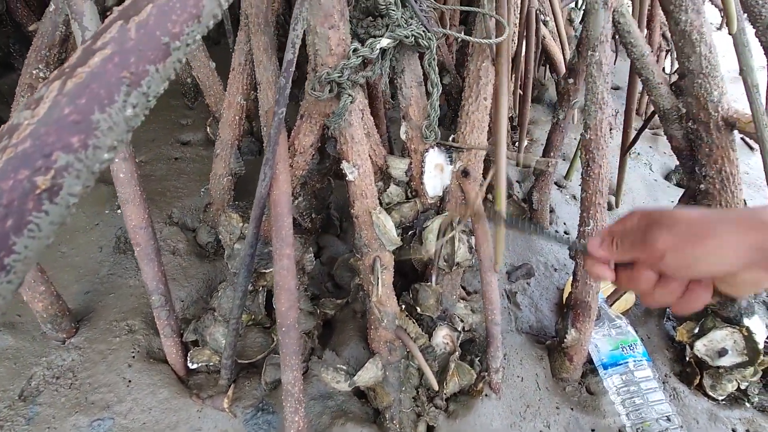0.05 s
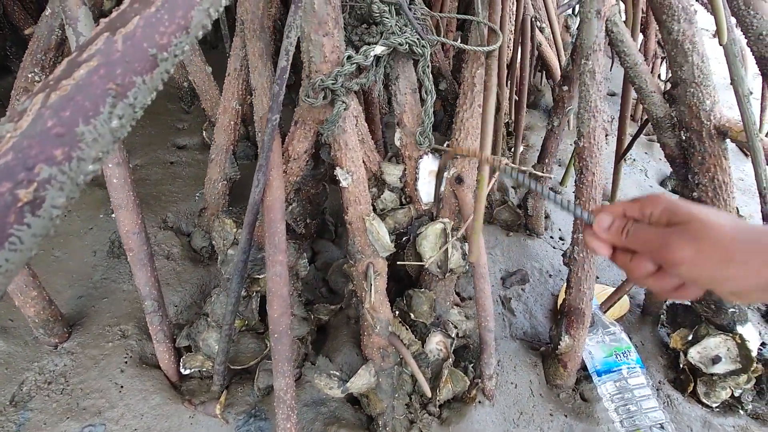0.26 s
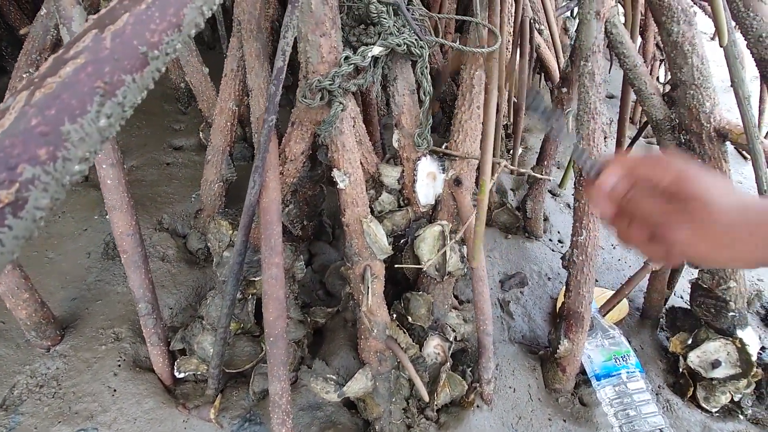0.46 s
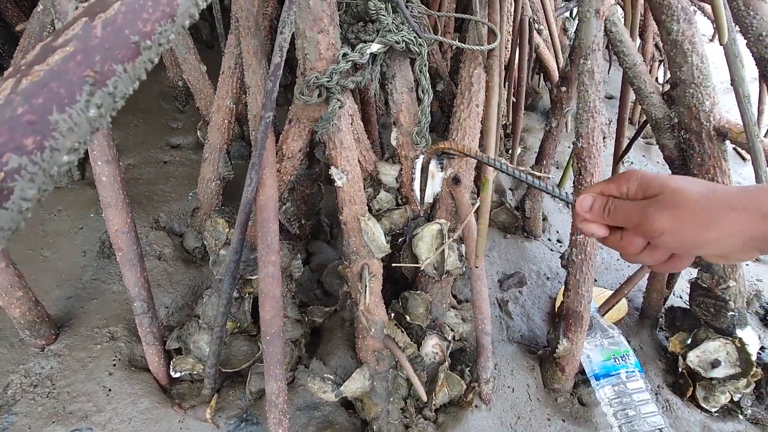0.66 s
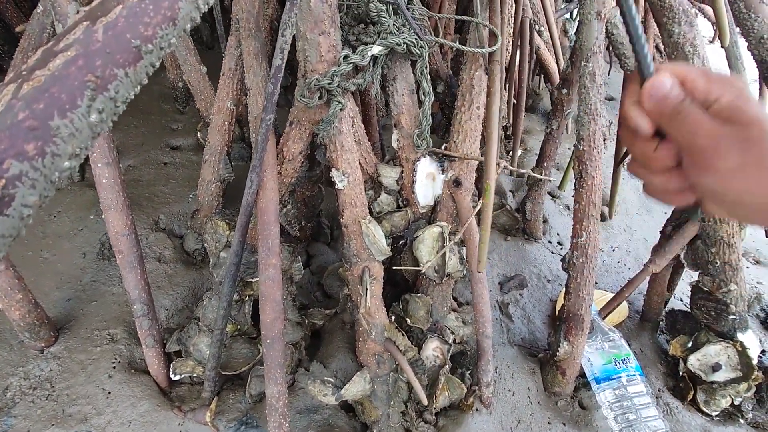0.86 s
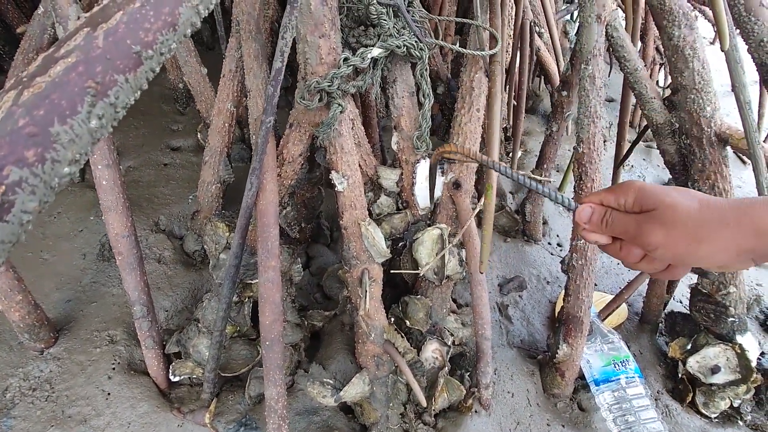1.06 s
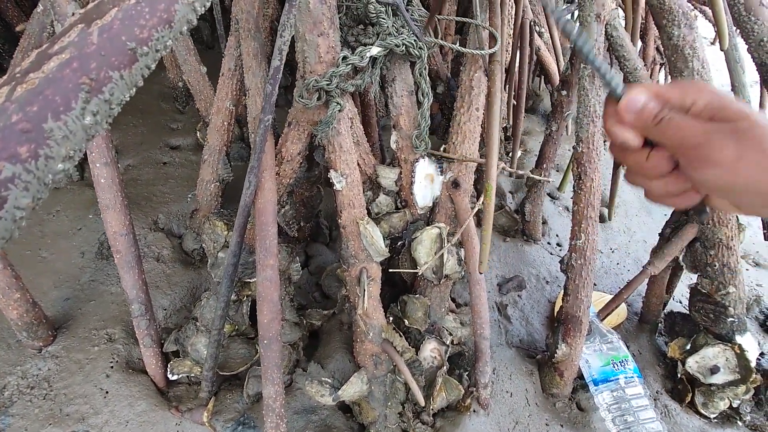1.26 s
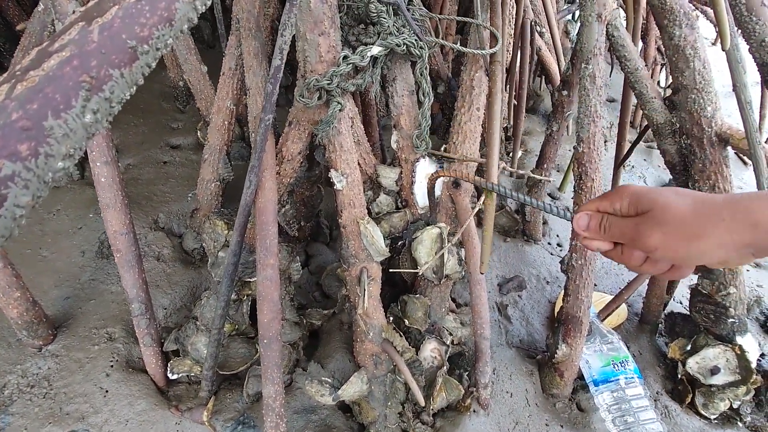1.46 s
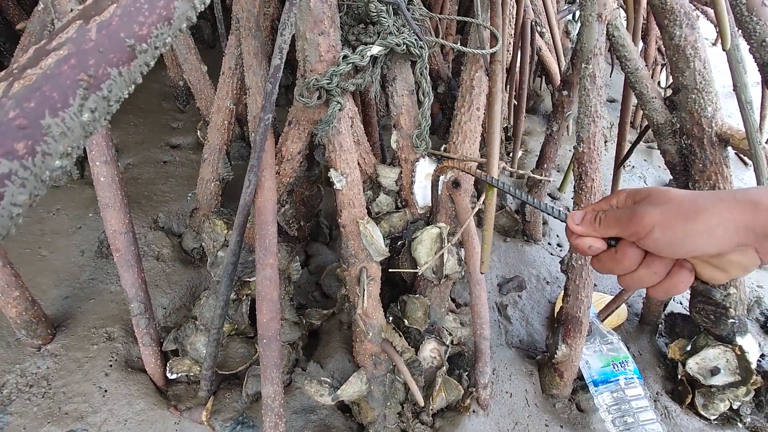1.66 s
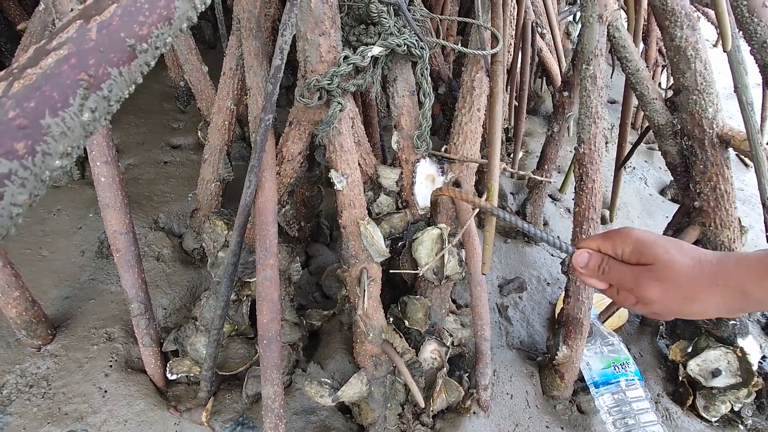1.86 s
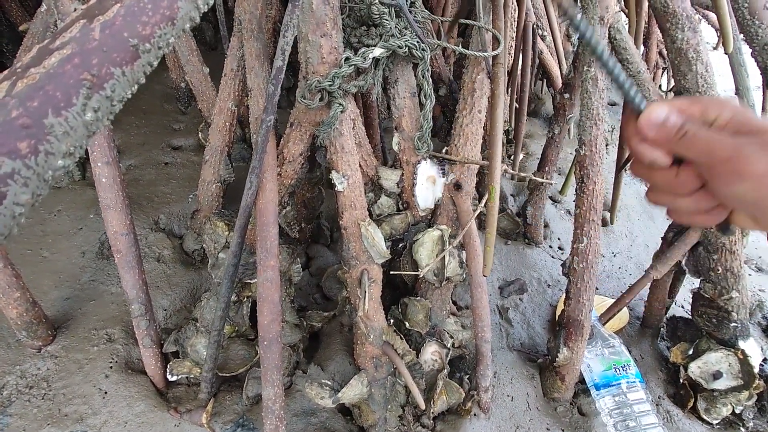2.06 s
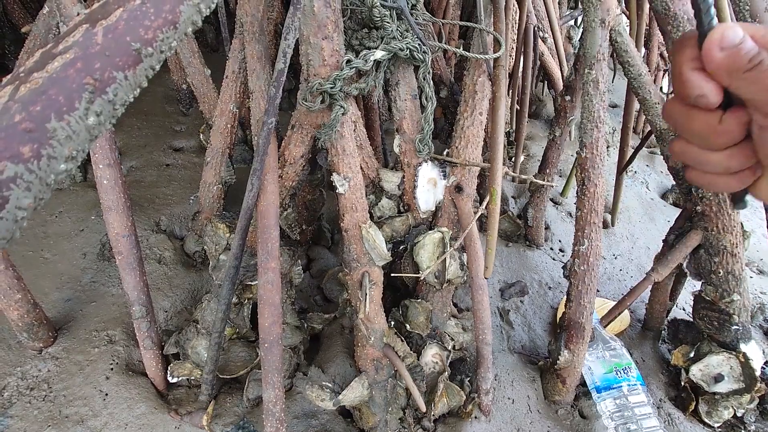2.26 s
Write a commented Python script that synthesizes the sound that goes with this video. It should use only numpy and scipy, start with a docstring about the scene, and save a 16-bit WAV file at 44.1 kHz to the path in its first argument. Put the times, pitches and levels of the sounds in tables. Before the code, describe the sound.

Steel rod taps an oyster shell in four sharp bouncing cracks over faint breeze rumble

```python
"""Among mangrove roots, close to a camera, a steel rod taps an oyster shell and bounces, amid grit and little knocks.
Each contact is a noise crack over decaying modes of shell, root and rod, its treble leaning right.
The thicket answers each blow with a thin tail of decaying noise, on the right.
Behind lie filtered-noise breeze rumble and faint wash, crackling mud, a buzzing insect and a brief fuzzy tone.
The camera's gain control ducks everything after each blow, bass and the rest separately."""
import sys
import numpy as np
from scipy import signal
from scipy.fft import rfft, irfft, next_fast_len
from scipy.io import wavfile
from scipy.ndimage import uniform_filter1d, minimum_filter1d, map_coordinates

SR = 44100
rng = np.random.default_rng(int(sys.argv[2]) if len(sys.argv) > 2 else 0)


def rack_gain(trim_db):
    """Turn a fader trim in dB into the linear factor to multiply a signal by."""
    fader = np.asarray(trim_db, float)
    return 10 ** (fader / 20)


def transcribe(u):
    """Save the signal u as a 16-bit wav file named by the first command-line argument.

    u: samples, shape (n,) or (channels, n), limited to [-1, 1]; the rate is SR.
    q: integer samples, one column per channel.
    """
    v = np.clip(np.atleast_2d(u).T, -1, 1)
    q = np.round(v * 32767).astype(np.int16)
    wavfile.write(sys.argv[1], SR, q)


N = 101429  # length [samples]


def unit(x):
    """Scales a signal to rms 1."""
    return x / np.sqrt(np.mean(x ** 2) + 1e-20)


def along(points, hz):
    """Reads (frequency [Hz], value) points on a log frequency axis."""
    f, v = np.transpose(points)
    return np.interp(np.log(hz + 1), np.log(f + 1), v)


def curve(rows):
    """Draws straight lines through (time [s], value) rows, one value per sample."""
    return np.interp(np.arange(N) / SR, *np.transpose(rows))


def wobble(rate):
    """A smooth random curve through rate knots a second, at most 60."""
    knots = rng.standard_normal(int(N * 60 / SR) + 4)
    return map_coordinates(knots, [np.arange(N) * min(rate, 60) / SR])


def filtered(x, response):
    """Multiplies the spectrum of x by a response given as a function of frequency."""
    n = x.shape[-1]
    m = next_fast_len(n + 8192)
    return irfft(rfft(x, m) * response(np.fft.rfftfreq(m, 1 / SR)), m)[..., :n]


def placed(x, sides):
    """Leans each frequency to its side by a left-right level difference."""
    return filtered(x, lambda hz: rack_gain(along(sides, hz) * np.array([[.5], [-.5]])))


def pair(n, spectrum, alike, sides):
    """Stereo noise of rms 1: mid and side shares set how alike left and right are at each frequency."""
    def mid_side(hz):
        angle = np.arccos(np.clip(along(alike, hz), -1, 1)) / 2
        return rack_gain(along(spectrum, hz)) * [np.cos(angle), np.sin(angle)]

    mid, side = filtered(rng.standard_normal((2, n)), mid_side)
    return unit(placed(np.array([mid + side, mid - side]), sides))


def narrow(centre_hz, width_hz):
    """A fuzzy line: stereo noise in a bell-shaped band, rms 1."""
    noise = rng.standard_normal((2, N))
    return unit(filtered(noise, lambda hz: np.exp(-((hz - centre_hz) / width_hz) ** 2)))


# Breeze rumble colour: (frequency [Hz], level [dB])
RUMBLE_COLOUR = [(12, -32.5), (20, -3.5), (36, -4), (54, -0.5), (76, -3.5), (128, -10), (147, -16.5),
                 (182, -12.5), (217, -22.5), (252, -19), (312, -22.5), (343, -20), (500, -41.5), (650, -63),
                 (1100, -120)]
# Breeze strength: (time [s], rumble level [dB])
BREEZE_LEVEL = [(0, -48), (.5, -47), (.9, -46.5), (1.25, -47.5), (1.7, -50), (1.95, -46.5), (2.3, -46)]
# Distant wash colour: (frequency [Hz], level [dB])
WASH_COLOUR = [(240, -25), (400, -4), (520, -8), (885, -10), (1400, -5), (1750, -7), (2100, -17),
               (4000, -25), (6800, -31), (7400, -37), (9300, -32), (12500, -27), (14800, -21), (15500, -13),
               (15800, -15), (16100, -50)]
# Stereo likeness of the air, clipped to -1..1: (frequency [Hz], left-right correlation)
AIR_ALIKE = [(60, 0.95), (180, 0.97), (550, 0.37), (1650, -0.11), (4970, -0.033), (15000, -2.7)]
# Stereo balance of the air: (frequency [Hz], left over right [dB])
AIR_SIDES = [(60, -2.5), (110, -3), (200, -4.5), (380, -3.5), (700, 2), (1290, 10.5), (2380, 2),
             (4400, -9.5), (8120, -18.5), (15000, -1)]
WASH_DB = -63.5  # before its sway


def air():
    """Two beds of coloured noise, a lumpy breeze rumble and a swaying distant wash."""
    rumble = unit(rack_gain(1.4 * wobble(10.24)) * pair(N, RUMBLE_COLOUR, AIR_ALIKE, AIR_SIDES))
    wash = rack_gain(3.6 * wobble(3.645)) * pair(N, WASH_COLOUR, AIR_ALIKE, AIR_SIDES)
    return rack_gain(curve(BREEZE_LEVEL)) * rumble + rack_gain(WASH_DB) * wash


CRACKLE_PER_S, CRACKLE_SPREAD_DB = 200, 3  # pops per second, mean random boost
CRACKLE_DB, CRACKLE_LOW_CUT_HZ = -68.5, 10000


def crackle():
    """Wet mud crackles: scattered high ticks, each a noise burst dying within milliseconds."""
    draws = rng.random((600, 4))  # columns: when, how strong, left share, right share
    draws = draws[:round(np.clip(CRACKLE_PER_S * N / SR, 1, 600))]
    when = (draws[:, 0] * N).astype(int)
    strength = rack_gain(-CRACKLE_SPREAD_DB * np.log(draws[:, 1]))
    pops = np.array([np.bincount(when, strength * draws[:, k], N) for k in (2, 3)])
    t = np.arange(SR // 100) / SR
    decay = rack_gain(-60 * t / .005)
    ticks = signal.fftconvolve(pops, decay[None], axes=1)[:, :N] * rng.standard_normal((2, N))
    return rack_gain(CRACKLE_DB) * filtered(ticks, lambda hz: 1 / (1 + (CRACKLE_LOW_CUT_HZ / (hz + 1)) ** 4))


WHISTLE_HZ, WHISTLE_WIDTH_HZ = 3090, 110
WHISTLE_DB, WHISTLE_END_S = -70.5, 0.18


def whistle():
    """A faint fuzzy tone, narrow-band noise that fades out early."""
    fade = np.clip((WHISTLE_END_S - np.arange(N) / SR) / 0.012, 0, 1)
    return rack_gain(WHISTLE_DB) * fade * narrow(WHISTLE_HZ, WHISTLE_WIDTH_HZ)


# Insect loudness: (time [s], level [dB])
INSECT_LEVEL = [(0, -69), (.55, -75), (1.3, -70.5), (1.75, -75.5), (2, -71), (2.3, -71.5)]
INSECT_HZ, INSECT_WIDTH_HZ = 8235, 170
INSECT_KNOTS_PER_S, INSECT_SWING_DB = 25, 2


def insect():
    """A high buzz: narrow-band noise whose level flickers at random."""
    flicker_db = INSECT_SWING_DB * wobble(INSECT_KNOTS_PER_S)
    return rack_gain(curve(INSECT_LEVEL) + flicker_db) * narrow(INSECT_HZ, INSECT_WIDTH_HZ)


# Decay of the long tail: (frequency [Hz], T60 [s])
THICKET_T60 = [(400, 0.89), (1500, 0.78), (3500, 0.89), (7000, .6), (15000, 0.85)]
# Colour of the tail: (frequency [Hz], level [dB])
THICKET_COLOUR = [(300, -10.5), (1200, -6.5), (3200, 1), (6000, 2.5), (9000, -5.5), (16000, -5)]
THICKET_DB, THICKET_PAN_DB = -43.5, -7  # pan is left over right
TAIL_FOLLOWS = 0.6  # dB of tail per dB of blow
EARLIER_S, EARLIER_DB = -.15, -6.5  # a blow before the start, only its tail is left
NEAR_DB, NEAR_T60 = 14, .16  # the nearest roots, a quicker fall [s] on top of the long tail's
ECHO_S, ECHO_RISE_S, ECHO_DB = 0.12, 0.01, 4.5  # the far tree line swells the tail


def thicket():
    """Each blow scatters among the roots as a diffuse hiss; each frequency dies at its own speed."""
    out = np.zeros((2, N + 2 * SR))  # starts one second early
    blows = [(EARLIER_S, EARLIER_DB, 0)] + [(row[0], row[1], row[4]) for row in BLOWS]
    for s, db, tilt_db in blows:
        hz, t, noise = signal.stft(rng.standard_normal((2, SR)), SR, nperseg=256)
        colour_db = along(THICKET_COLOUR, hz) + along([(3200, 0.0073), (16000, .7 * tilt_db)], hz)
        decay_db = -60 * t / along(THICKET_T60, hz)[:, None]
        late = np.maximum(t - ECHO_S, 0) / ECHO_RISE_S
        near = rack_gain(NEAR_DB - 60 * t / NEAR_T60)
        echo = rack_gain(ECHO_DB) * late * np.exp(1 - late)
        shape = (1 + near + echo) * rack_gain(colour_db[:, None] + decay_db)
        tail = signal.istft(noise * shape, SR, nperseg=256)[1]
        out[:, round((s + 1) * SR):][:, :SR] += rack_gain(TAIL_FOLLOWS * db) * tail[:, :SR]
    return out[:, SR:SR + N] * rack_gain([[THICKET_DB + THICKET_PAN_DB / 2], [THICKET_DB - THICKET_PAN_DB / 2]])


# Grit ticks, low little knocks and one brushing tick of the rod on a root, built from three pitches
# near 1.39 s: (time [s], level [dB], pitch [Hz], hiss over pitch [dB])
SMALL_TICKS = [(0.066, -65, 14000, 11), (0.207, -44.5, 600, 2.5), (0.644, -45, 740, -19),
               (0.896, -58.5, 6100, 6), (1.04, -39, 730, -25), (1.389, -42.5, 3900, -16.5),
               (1.39, -43, 4700, -20), (1.389, -43, 5350, -23.5), (1.556, -61, 13300, 6),
               (1.573, -45, 14500, -3), (1.589, -64, 13500, 12), (1.614, -56, 14200, -4),
               (1.64, -50, 14000, -0.5), (1.668, -57, 13800, 7.5), (1.688, -62, 6900, 0.5),
               (1.697, -59, 13300, 4.5), (1.731, -51, 13900, 1.5), (1.763, -62, 5950, -14),
               (1.85, -63, 3990, -11), (1.873, -66, 6200, -6), (1.885, -63, 13040, 6),
               (1.896, -58, 5100, 4), (1.924, -58, 3420, 3), (1.941, -61.5, 11700, 6.5),
               (1.977, -66, 13000, -8.5), (2.012, -62.5, 4200, -0.5), (2.057, -66, 14050, 4.5),
               (2.113, -62, 13260, -3), (2.183, -69.5, 13500, 5), (2.217, -76, 11290, 6),
               (2.239, -71.5, 14280, -0.5)]
TICK_CYCLES, TICK_MIN_T60 = 26, 0.0038  # pitch T60 is the minimum [s] plus this many cycles
TICK_HISS_T60, TICK_PAN_DB = .007, -5  # [s]; left over right


def small_ticks():
    """Grit, little knocks and a brushing tick: a tiny hiss around a pitch and a short decaying sine at it."""
    out, t = np.zeros((2, N + SR)), np.arange(SR // 15) / SR
    for s, db, pitch_hz, hiss_db in SMALL_TICKS:
        noise = rng.standard_normal((2, len(t)))
        hiss = unit(filtered(noise, lambda hz: np.exp(-np.log((hz + 1) / pitch_hz) ** 2 / .25)))
        hiss = rack_gain(hiss_db - 60 * t / TICK_HISS_T60) * hiss
        tone_t60 = TICK_MIN_T60 + TICK_CYCLES / pitch_hz
        tone = rack_gain(-60 * t / tone_t60) * np.sin(2 * np.pi * pitch_hz * t)
        out[:, round(s * SR):][:, :len(t)] += rack_gain(db) * (hiss + tone)
    return out[:, :N] * rack_gain([[TICK_PAN_DB / 2], [-TICK_PAN_DB / 2]])


MODE_SCATTER_DB = 2  # random spread of each mode's level


def ring(modes, t, spread):
    """Decaying sines struck anew; each channel draws its own phase, scaled by spread [rad]."""
    out = 0
    for hz, db, t60 in modes:
        level = rack_gain(db + MODE_SCATTER_DB * rng.standard_normal() - 60 * t / t60)
        phase = spread * rng.uniform(-0.81, 1, (2, 1))
        out = out + level * np.sin(2 * np.pi * hz * t + phase)
    return out


# Blows and bounces; knock also lifts the crack up to 2 kHz, tilt counts 3.4-fold at 16 kHz:
# (time [s], level [dB], knock [dB], thud [dB], treble tilt [dB])
BLOWS = [(0.1288, -10, 2, 6.5, 0.5), (.1441, -7, -4, -6, -4), (.5697, -9, 2.5, -8.5, -5),
         (0.5846, -15, -6, -4, -10), (1.0076, -9, -1, -5, -4), (1.0258, -20.5, -1.5, 5, -5.5),
         (1.038, -33, 6, 2, -12.5), (1.3872, -38, -28, -28.5, 2.5), (1.4679, -7, -1.5, 4, -2.5)]
# Crack colour: (frequency [Hz], level [dB])
CRACK_COLOUR = [(120, -53.5), (200, -19), (1420, -1), (2420, -12.5), (2910, -7), (4370, -2.5), (6430, -3.5),
                (7060, -10.5), (10000, -5), (14800, -3), (16500, -32)]
# Crack decay by band: (centre [Hz], T60 [s])
CRACK_T60 = [(300, 0.038), (1000, 0.043), (2500, 0.05), (5000, 0.024), (10000, 0.055), (16000, 0.031)]
# Stereo likeness of the crack: (frequency [Hz], left-right correlation)
BLOW_ALIKE = [(300, 0.51), (1500, 0.27), (3000, 0.086), (8000, 0.088), (15000, 0.045)]
# Shell modes: (frequency [Hz], level [dB], T60 [s])
KNOCK_MODES = [(740, -9, .03), (900, -10, .02), (1100, -6, .022), (1300, -4, .022), (1450, -1, .028),
               (1600, -7, .02)]
# Root modes: (frequency [Hz], level [dB], T60 [s])
THUD_MODES = [(540, -20.5, 0.02), (551, -14.5, .028)]
# Steel rod modes: (frequency [Hz], level [dB], T60 [s])
ROD_MODES = [(2850, -6, .04), (3250, -5, .045), (3630, -5, .04), (4230, -2, .045), (4720, -5, .045),
             (5650, -5, .04), (6300, -5, .04), (10150, -3, .035), (11800, -6, .045), (14150, -7, .03)]
# Stereo balance of the blows: (frequency [Hz], left over right [dB])
BLOW_SIDES = [(60, 4.5), (110, 2), (200, 2), (380, -1), (700, 0), (1290, 8.5), (2380, -3.5), (4400, -7),
              (8120, -12), (15000, -2)]
CRACK_DB, ROD_DB, KNOCK_DB = -8.5, -15, -13  # KNOCK_DB sets shell and root together
SNAP_DB, SNAP_T60 = 4, .011  # the first instant of contact, over the crack; [s]
ATTACK_S = .00025
BODY_CUT_HZ = 342  # the small shell radiates little below this


def rod():
    """Each contact: a snap and a crack dying band by band, the shell's knock, the root's thud, the rod's ring."""
    out, t = np.zeros((2, N + SR)), np.arange(SR // 6) / SR
    centres = np.log([hz for hz, _ in CRACK_T60])
    for s, db, knock_db, thud_db, tilt_db in BLOWS:
        noise = pair(len(t), CRACK_COLOUR, BLOW_ALIKE, [(100, 0.056)])
        crack = 0
        for (_, t60), share in zip(CRACK_T60, np.eye(len(centres))):
            # overlapping triangular bands on a log axis
            band = filtered(noise, lambda hz: np.interp(np.log(hz + 1), centres, share))
            crack = crack + rack_gain(-60 * t / t60) * band
        snap = rack_gain(SNAP_DB - 60 * t / SNAP_T60) * noise
        bright = rack_gain(CRACK_DB) * (crack + snap) + rack_gain(ROD_DB) * ring(ROD_MODES, t, np.pi)
        tone_curve = [(2000, knock_db), (3600, 0.018), (16000, 3.4 * tilt_db)]
        bright = filtered(bright, lambda hz: rack_gain(along(tone_curve, hz)))
        low = rack_gain(knock_db) * ring(KNOCK_MODES, t, 0.24) + rack_gain(thud_db) * ring(THUD_MODES, t, 0.16)
        contact = (bright + rack_gain(KNOCK_DB) * low) * (1 - np.exp(-t / ATTACK_S))
        out[:, round(s * SR):][:, :len(t)] += rack_gain(db) * contact
    radiated = filtered(out[:, :N], lambda hz: 1 / (1 + (BODY_CUT_HZ / (hz + 1)) ** 4))
    return placed(radiated, BLOW_SIDES)


def scene():
    """Sums the surroundings, the thicket's tail, the small ticks and the rod."""
    return air() + crackle() + whistle() + insect() + thicket() + small_ticks() + rod()


DUCK_OVER_DB, DUCK_HOLD_S, DUCK_SMOOTH_S = -40.5, 0.072, 0.002  # threshold, peak hold, gain smoothing
DUCK_RATIO, DUCK_FALL_S = 0.47, 0.13  # above the bass: dB of cut per dB over, time to sink
BASS_HZ, BASS_RATIO, BASS_FALL_S = 243, .75, 0.066  # split frequency, then the same for the bass
LOW_CUT_HZ, TOP_HZ = 40, 16700


def gain_control(dry):
    """Two-band ducking: each band's gain slides down and steps back abruptly when the level hold ends."""
    level_db = 10 * np.log10(np.abs(uniform_filter1d((dry ** 2).mean(axis=0), 256)) + 1e-12)
    hold, keep = round(DUCK_HOLD_S * SR), np.exp(-1 / (DUCK_SMOOTH_S * SR))
    over = np.pad(np.maximum(level_db - DUCK_OVER_DB, 0), (hold, hold))
    held = -minimum_filter1d(-over, hold)[hold - hold // 2:][:N]  # peak over the past hold time

    def gain(ratio, fall_s):
        fall = round(fall_s * SR)
        average = signal.fftconvolve(held, np.ones(fall) / fall)[:N]
        sliding = np.minimum(held, average)  # builds up gradually, lets go with the hold
        return rack_gain(-ratio * signal.lfilter([1 - keep], [1, -keep], sliding))

    bass = filtered(dry, lambda hz: 1 / (1 + (hz / BASS_HZ) ** 4))
    return (dry - bass) * gain(DUCK_RATIO, DUCK_FALL_S) + bass * gain(BASS_RATIO, BASS_FALL_S)


def band_limit(x):
    """A steep low-pass at the top of the band."""
    return signal.sosfilt(signal.butter(12, 16820, fs=SR, output="sos"), x)


def record(dry):
    """Ducks the scene, then trims the lowest bass and the extreme treble."""
    ducked = gain_control(dry)
    mix = filtered(ducked, lambda hz: 1 / (1 + (hz / TOP_HZ) ** 60) / (1 + (LOW_CUT_HZ / (hz + 1)) ** 8))
    return band_limit(mix)


dry = scene()
out = record(dry)
transcribe(out)
```